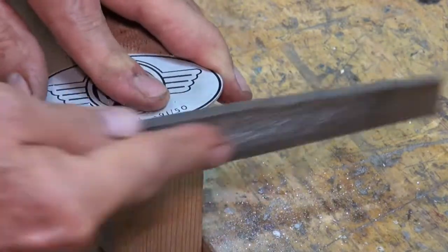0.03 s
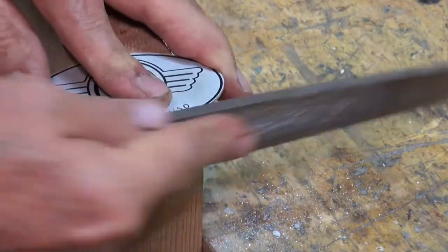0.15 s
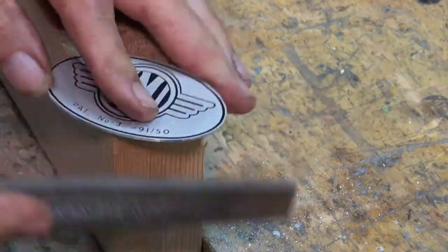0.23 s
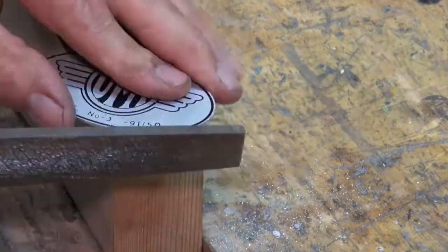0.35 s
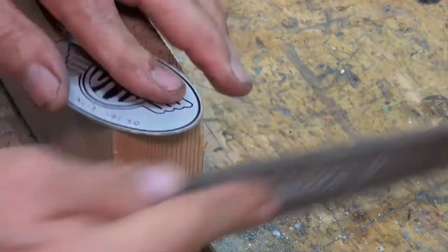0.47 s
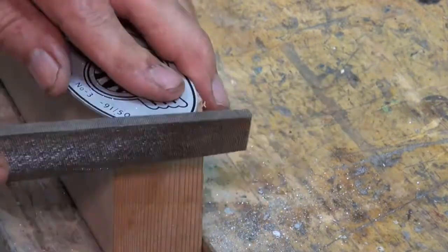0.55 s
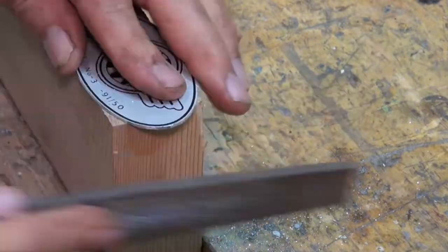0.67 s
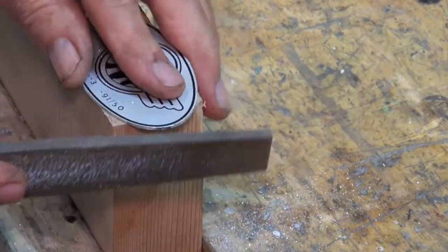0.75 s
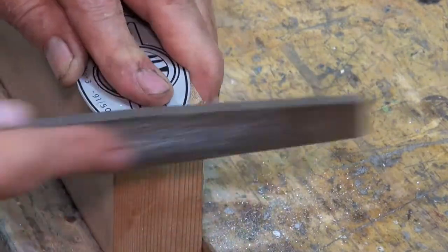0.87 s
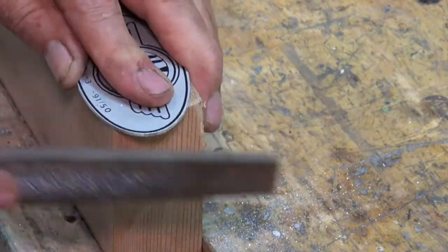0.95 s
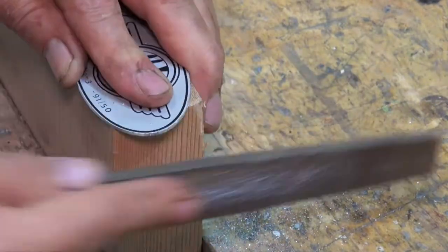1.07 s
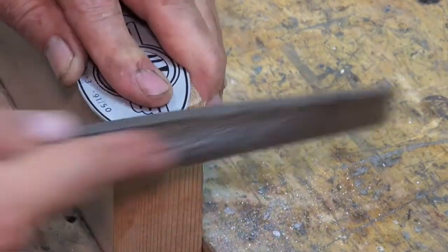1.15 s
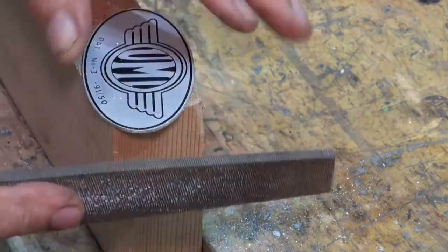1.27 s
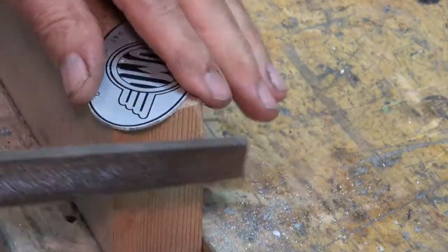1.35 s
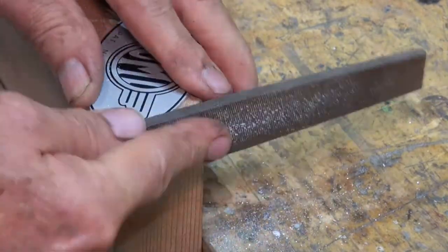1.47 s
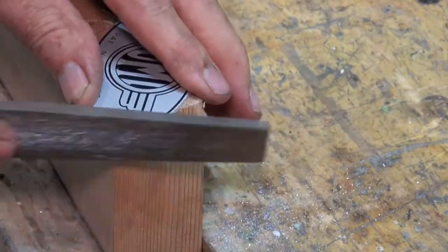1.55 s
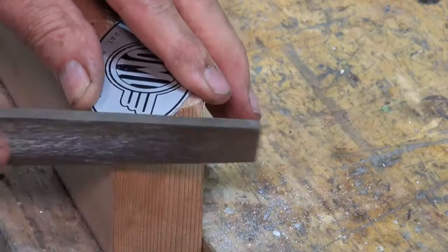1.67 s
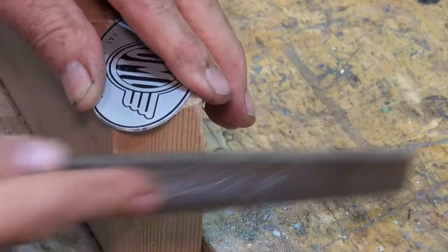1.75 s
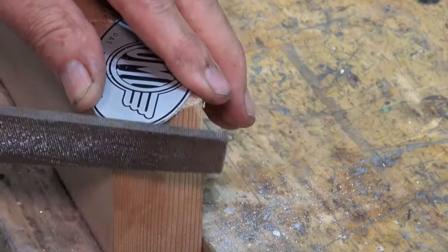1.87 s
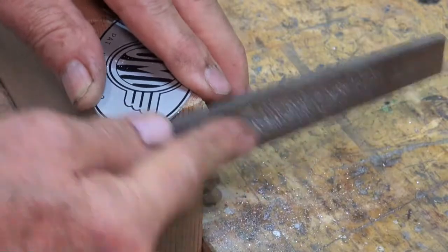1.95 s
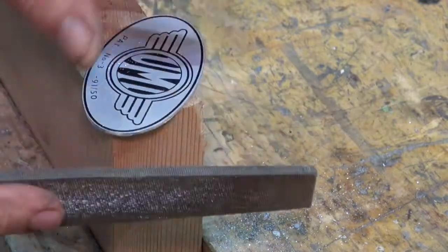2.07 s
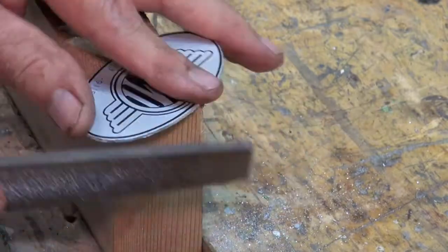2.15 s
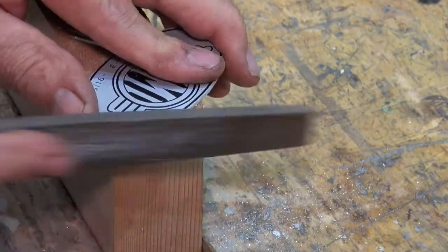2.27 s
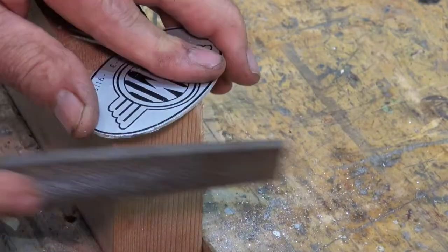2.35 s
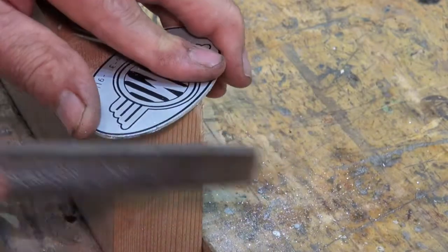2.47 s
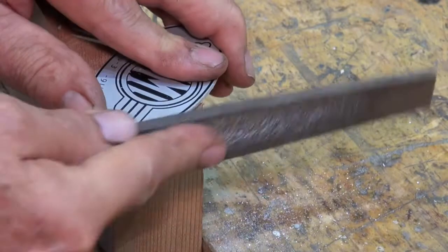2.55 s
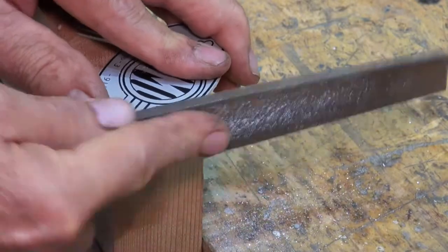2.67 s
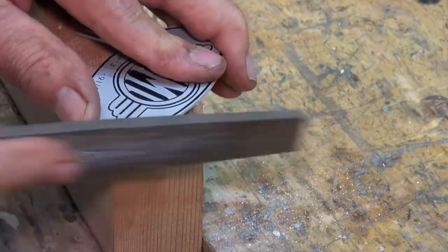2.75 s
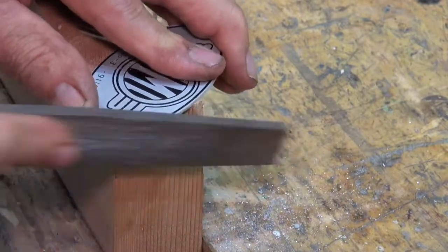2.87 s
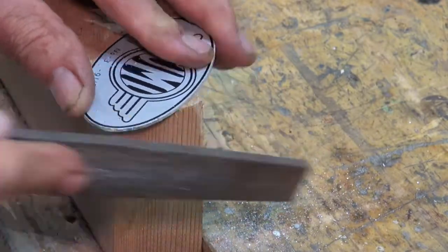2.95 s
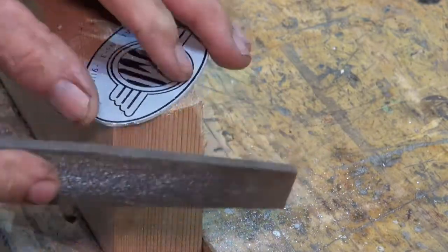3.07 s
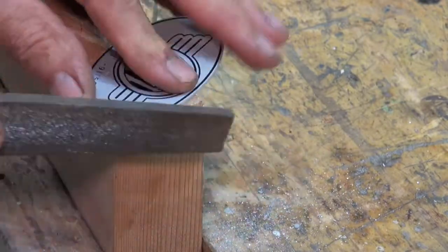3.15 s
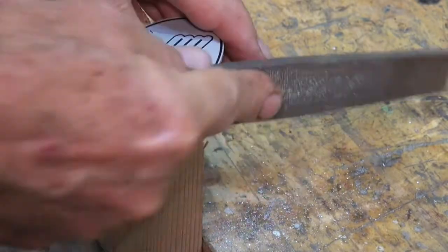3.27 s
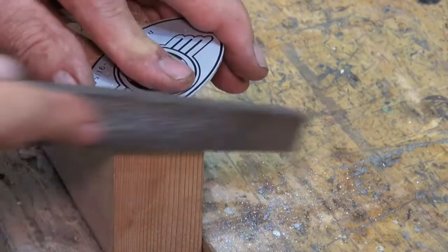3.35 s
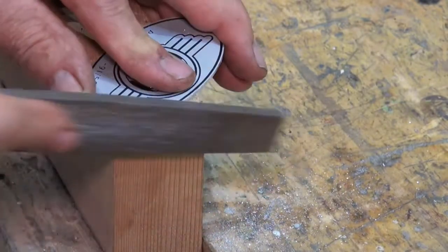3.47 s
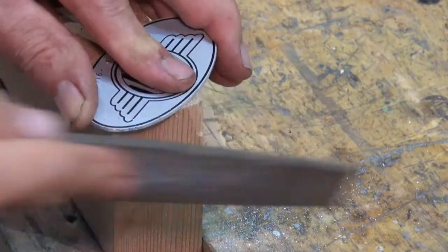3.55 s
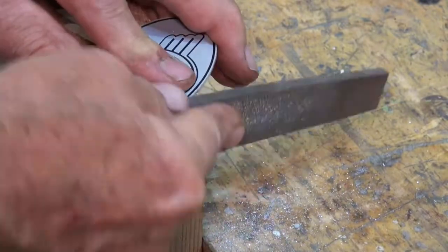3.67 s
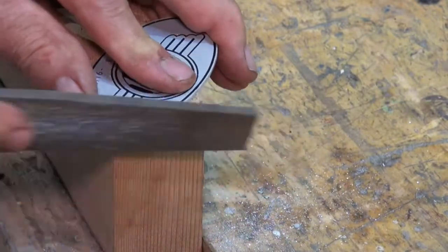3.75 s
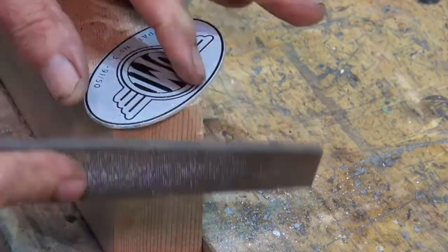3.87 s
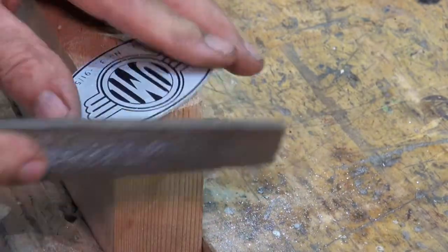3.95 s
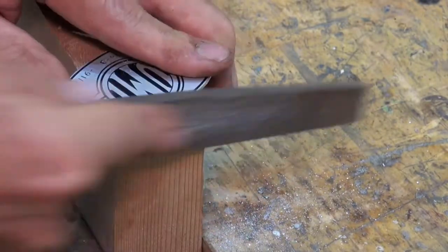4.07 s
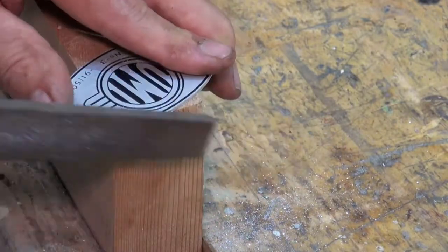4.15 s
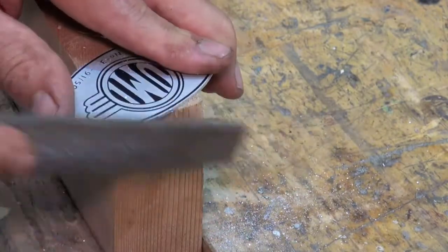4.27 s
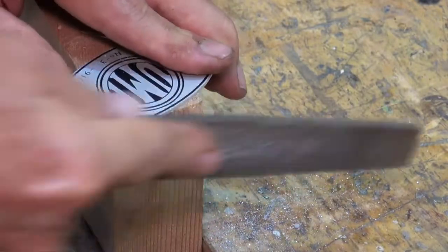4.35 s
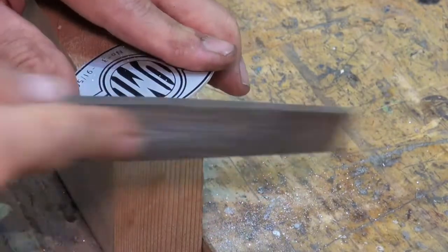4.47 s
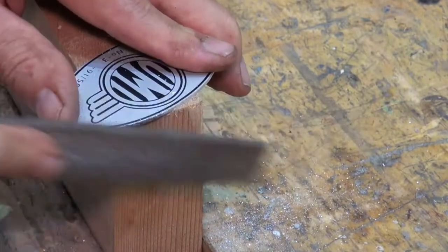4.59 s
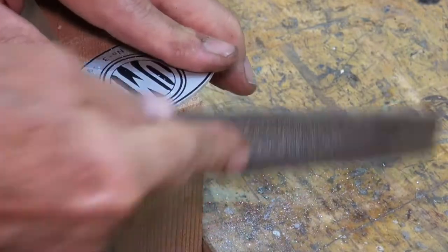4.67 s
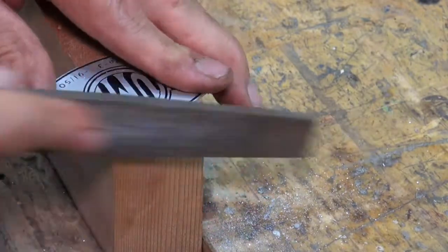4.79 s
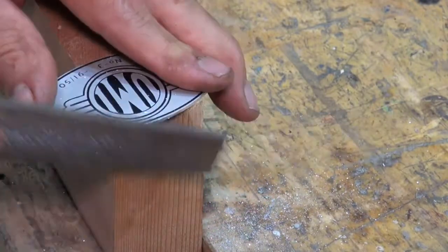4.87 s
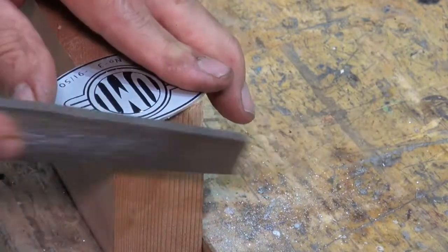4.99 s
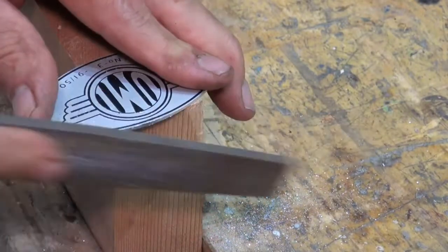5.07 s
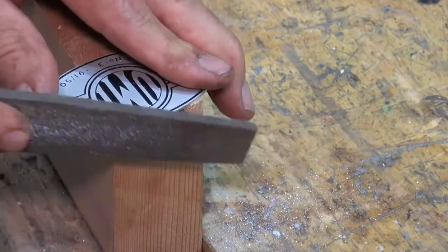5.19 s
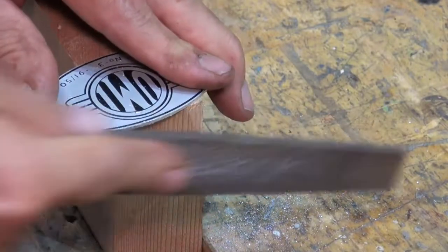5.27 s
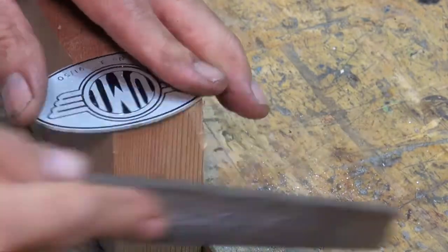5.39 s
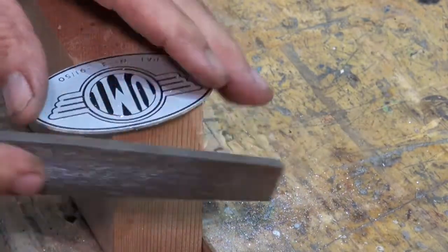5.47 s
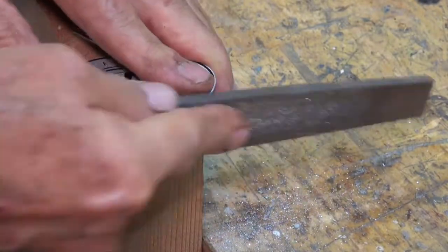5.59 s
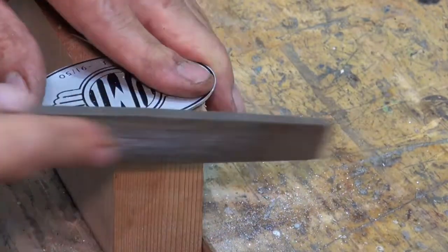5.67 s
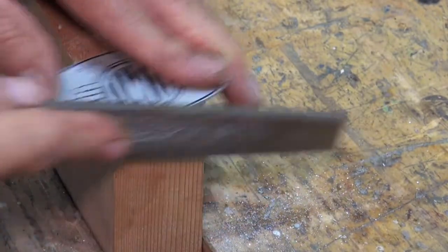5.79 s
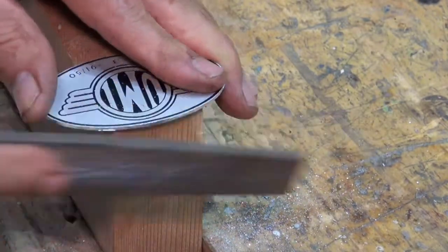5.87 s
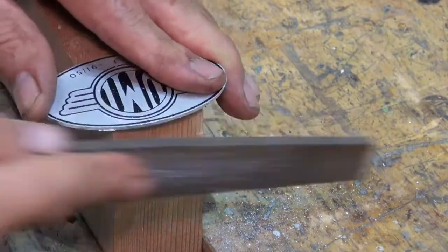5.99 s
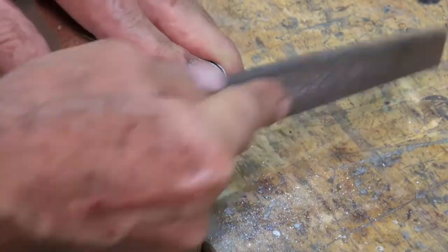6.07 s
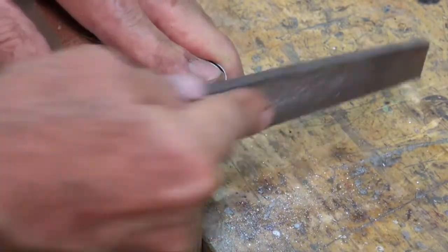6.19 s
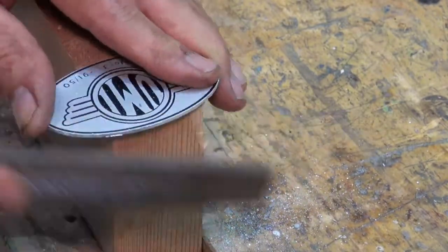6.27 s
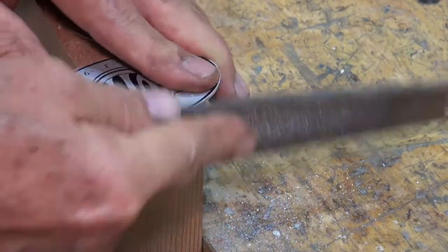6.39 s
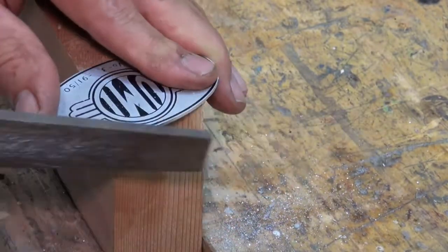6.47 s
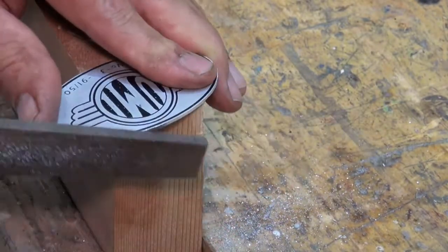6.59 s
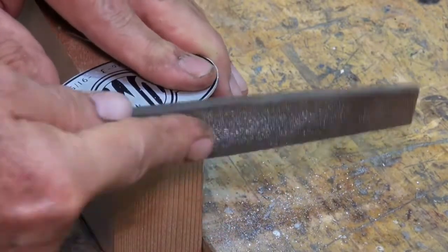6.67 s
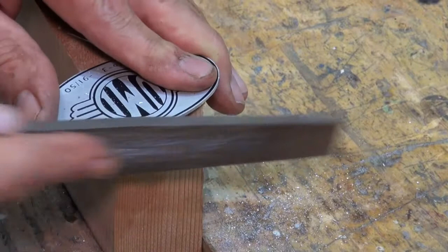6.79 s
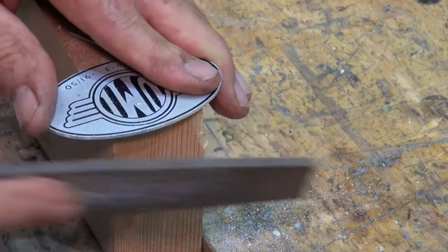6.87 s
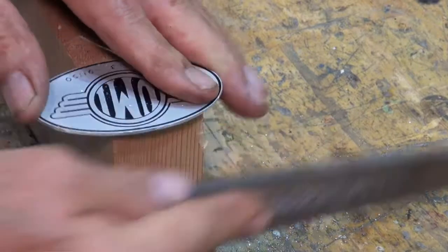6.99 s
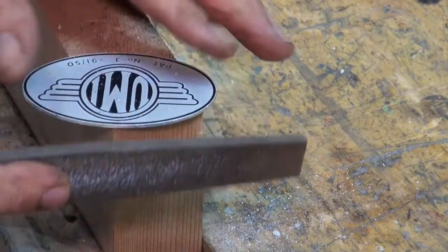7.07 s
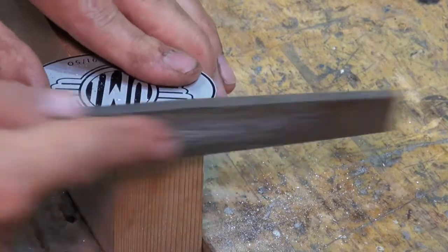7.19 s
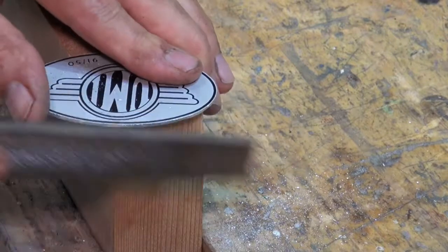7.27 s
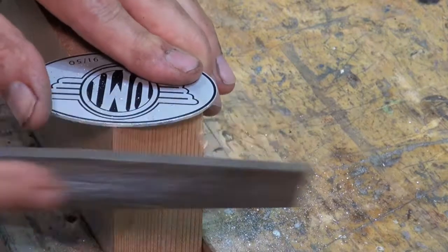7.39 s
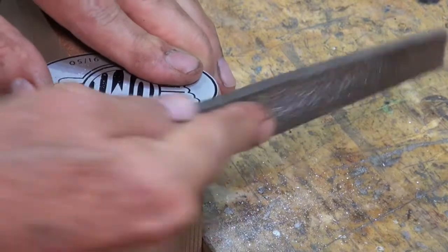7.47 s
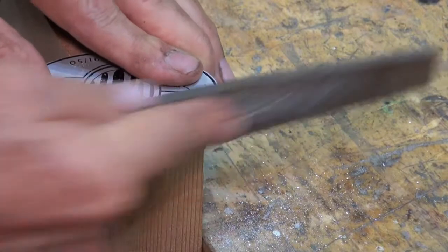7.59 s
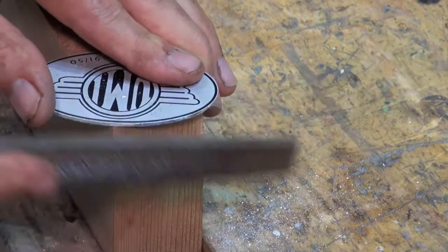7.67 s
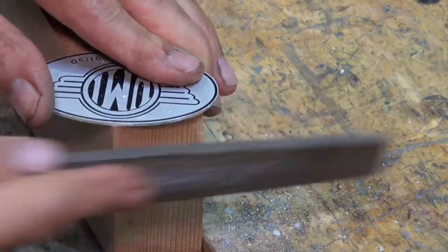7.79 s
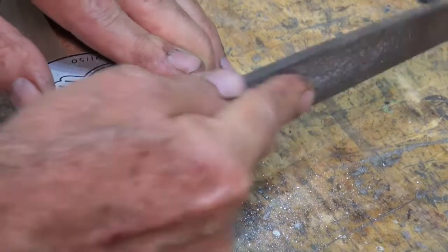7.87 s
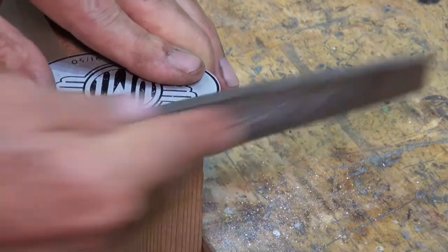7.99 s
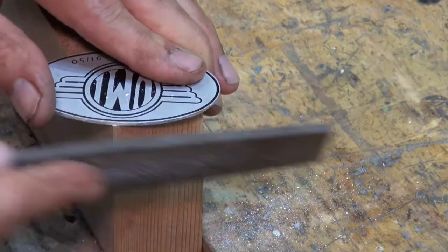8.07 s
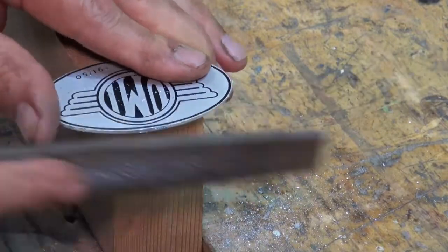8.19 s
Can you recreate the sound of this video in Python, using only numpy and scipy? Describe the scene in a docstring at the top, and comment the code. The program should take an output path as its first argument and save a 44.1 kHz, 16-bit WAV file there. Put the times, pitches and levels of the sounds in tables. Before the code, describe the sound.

Close, rapid filing of thin metal on a wooden block, each gritty stroke ticking, buzzing and ringing briefly.

```python
"""Filing a thin metal plate on a wooden block, heard close up in stereo in a quiet, dry workshop. Over the
faint hum of the room a steel file lands on the rim with a tick, drags, bites and lifts. Its teeth buzz the
modes of plate and file, grit hisses, the block thuds, and the lifted file rings on briefly. Short strokes
follow in runs for eight seconds. In some early pauses fingers nudge and slide the plate; a few of the loudest
strokes come with a short, dull low thump."""
import sys
import numpy as np
from scipy import signal
from scipy.fft import rfft, irfft, next_fast_len
from scipy.io import wavfile
from scipy.ndimage import uniform_filter1d, map_coordinates

SR = 44100
rng = np.random.default_rng(int(sys.argv[2]) if len(sys.argv) > 2 else 0)


def generate_wav(signal):
    """Clip the signal to [-1, 1] and save it as 16-bit WAV at the path in sys.argv[1]."""
    frames = np.transpose(np.atleast_2d(signal))
    scaled = np.clip(frames, -1, 1) * 32767
    pcm = np.round(scaled).astype(np.int16)
    wavfile.write(sys.argv[1], SR, pcm)


N = 363384
TIME = np.arange(N) / SR

# file strokes: landing_s, tick_db, full_bite_after_ms, lift_after_ms, bite_db, brightness_db
STROKES = [(0.0224, -16.5, 48.5, 73, -19.5, -9.5), (0.1643, -7, 36, 50.3, -19, -6),
           (0.4341, -15.5, 48.5, 69, -16.5, -8.5), (0.6201, -19, 35, 68, -19, -6.5),
           (0.8866, -15.5, 45, 68.4, -16.5, -10), (1.051, -9.5, 25, 59.4, -15.5, -11.5),
           (1.183, -8.5, 33.4, 51.5, -15.5, -8), (1.4572, -16.5, 56.7, 65.6, -13, -8),
           (1.614, -10, 29, 43, -12.5, -11), (1.739, -9, 29, 48.6, -17, -7),
           (1.8645, -9.5, 12, 22, -25.5, -12), (1.936, -10, 42.4, 63, -15, -9.5),
           (2.2499, -26, 84.6, 121.5, -17.5, -9), (2.439, -10.5, 29, 41, -16.5, -4.5),
           (2.5547, -8, 35.5, 49.6, -13, -9), (2.685, -10, 23, 45, -16, -9),
           (2.7965, -16, 25, 44, -15.5, -11.5), (2.916, -15.5, 36, 49.2, -19.5, -4.5),
           (3.2357, -25.5, 57.6, 82.3, -18, -8), (3.3949, -7.5, 43.6, 42.6, -15.5, -5),
           (3.5178, -8.5, 41, 53.4, -20.5, -4), (3.65, -21, 61, 65, -16, -4.5),
           (3.808, -9.5, 25, 47, -19.5, -7.5), (4.0716, -20.5, 58, 80.5, -17.5, -7),
           (4.2303, -13, 32, 50.6, -17, -6.5), (4.3524, -7.5, 32, 41.3, -19, -5),
           (4.4458, -11.5, 43.6, 38.6, -16.5, -1.5), (4.5655, -7.5, 34, 33.7, -19, -2.5),
           (4.6726, -9.5, 23, 47.4, -21, -4.5), (4.8234, -15.5, 41.5, 52.4, -17, -4),
           (4.9476, -9, 35, 38.6, -19, -4), (5.0492, -10, 37, 46, -18, -4.5),
           (5.1588, -9, 30, 37, -15.5, -4.5), (5.2604, -12, 31.4, 42, -18, -4),
           (5.3744, -9.5, 28.5, 37.4, -20, -2.5), (5.5798, -19.5, 46, 62.2, -16, -5.5),
           (5.717, -8, 30, 43, -20.5, -6.5), (5.8397, -5.5, 5.7, 39, -20, -6),
           (5.9654, -10.5, 33.5, 45.3, -16, -6), (6.0892, -10, 20, 44, -18.5, -7),
           (6.2163, -8.5, 16, 42.7, -21, -7.5), (6.3817, -19.5, 43, 64, -16, -7),
           (6.528, -16, 38, 58, -21.5, -3.5), (6.6605, -19, 63, 61.5, -15.5, -1.5),
           (6.8129, -11.5, 38, 69, -19.5, -5), (6.9648, -12, 31.4, 56.4, -22.5, -2.5),
           (7.206, -28, 47.3, 73.4, -19, -8), (7.3529, -9.5, 8, 56, -20, -7),
           (7.4897, -8.5, 18, 47, -19.5, -7), (7.6176, -5.5, 31.6, 55, -16, -9.5),
           (7.7552, -8, 27, 48, -19.5, -5.5), (7.89, -7.5, 14, 42.4, -19.5, -6),
           (8.0205, -8.5, 32, 48.3, -17.5, -7), (8.1556, -13, 26.6, 27.6, -18, -2)]
# modes of the plate before it is pressed down: pitch_hz, width_hz, level_db
LOOSE_PLATE_MODES = [(1890, 113, 1), (2248, 48, 4), (2700, 300, -8), (6110, 440, -10.5)]
# spectrum of rubbing grit: frequency_hz, density_db
GRIT_SPECTRUM = [(500, -15.5), (900, -16.5), (1500, -11.5), (2700, -7), (3650, -11), (5600, -5), (6400, -9),
                 (9000, -11.5), (14400, -20.5), (16000, -21)]


def amp(db):
    """Decibels to gain."""
    return 10 ** (np.asarray(db) / 20)


def unit(x):
    """Scaled to rms 1."""
    return x / np.sqrt(np.mean(x ** 2) + 1e-20)


def along(points, hz):
    """Interpolate (frequency_hz, value) points on a log axis."""
    f, v = np.transpose(points)
    return np.interp(np.log(hz + 1), np.log(f + 1), v)


def wobble(rate):
    """A smooth random curve, rate knots a second."""
    return map_coordinates(rng.standard_normal(int(N * rate / SR) + 4), [TIME * rate])


def filtered(x, response):
    """x through a complex frequency response."""
    size = next_fast_len(N + SR // 2)
    return irfft(rfft(x, size) * response(np.fft.rfftfreq(size, 1 / SR)), size)[..., :N]


def modes(table):
    """The response of (pitch_hz, width_hz, level_db) resonances of alternating sign."""
    return lambda f: sum((-1) ** k * amp(db) * 1j * f * width / (hz * hz - f * f + 1j * f * width)
                         for k, (hz, width, db) in enumerate(table))


def hiss(spectrum, level=1, spiky_db=0, patchy_db=0):
    """Two unrelated noises; spiky ones come in uneven grains, patchy ones change colour as they go."""
    spectra = signal.stft(rng.standard_normal((2, N)) * amp(spiky_db * wobble(900)), nperseg=256)[2]
    patches = uniform_filter1d(rng.standard_normal(spectra.shape[1:]), size=3, axis=0)
    patches = uniform_filter1d(patches, size=5, axis=1)
    grains = signal.istft(spectra * amp(patchy_db * unit(patches)), nperseg=256)[1][:, :N]
    colour = lambda hz: amp(along([(1, -120)] + spectrum, hz))
    colour_rms = np.sqrt(np.mean(colour(np.linspace(0, SR / 2, num=4096)) ** 2))
    return filtered(level * unit(grains), colour) / colour_rms


def workshop():
    """Room tone: still air, a faint steady whine and two low tones that sag."""
    air_spectrum = [(20, -12), (250, -14.5), (690, -10.5), (1020, -13.5), (2370, -13.5), (3420, -14.5),
                    (7100, -18), (11100, -23), (16000, -18.5)]  # still air: frequency_hz, density_db
    whine = [(1000, -70)]  # the steady tone: pitch_hz, level_db
    moans = [
        [(1.75, 276, -72), (2.0, 274.6, -58), (2.32, 269, -59), (2.6, 269, -71)],
        [(5.25, 214, -63), (5.4, 212, -58.5), (5.56, 212, -56), (5.62, 209, -88)],
    ]  # one path for each low tone: time_s, pitch_hz, level_db
    tones = sum(amp(db + 6.5 + 1.3 * wobble(16)) * np.sin(2 * np.pi * hz * TIME) for hz, db in whine)
    for path in moans:
        s, hz, db = np.transpose(path)
        phase = 2 * np.pi * np.cumsum(np.interp(TIME, s, hz)) / SR
        tones += amp(np.interp(TIME, s, db + 1.5, left=-120, right=-120)) * np.sin(phase)
    return amp(-50.5) * hiss(air_spectrum) + tones * [[1], [0]]  # tones in the mid channel only


def walls(x):
    """The room's short answer, in which the treble dies a little sooner."""
    decay = [(300, 0.074), (2000, 0.069), (12000, 0.065)]  # reverberation: frequency_hz, t60_s
    hz, t, spectra = signal.stft(rng.standard_normal((2, SR // 3)), SR, nperseg=256)
    tail = signal.istft(spectra * amp(-60 * t / along(decay, hz)[:, None]), SR, nperseg=256)[1]
    delayed = np.pad(x, ((0, 0), (200, 0)))
    return signal.fftconvolve(delayed, tail / np.linalg.norm(tail[0]), axes=1)[:, :N]


def fingers():
    """Shifted between strokes, the plate scuffs the block."""
    slides = [(.245, .31, -42), (0.77, .88, -45.5), (2.258, 2.32, -41), (3.09, 3.13, -47.5)]  # scuffs: start_s, end_s, level_db
    level = sum(amp(db) * (TIME > start) * (TIME < end) for start, end, db in slides)
    return hiss(GRIT_SPECTRUM, uniform_filter1d(level, size=500), spiky_db=-1.5, patchy_db=4.5)


def thumps():
    """Short, dull low thumps with a few of the loudest strokes: one pulse each, without ring."""
    pulses = [(1.977, -39), (2.712, -39), (6.416, -34), (6.849, -40), (7.659, -42)]  # low thumps: start_s, level_db
    out, age = np.zeros(N), TIME[:1500] / 0.00098  # age in rise times
    for s, db in pulses:
        out[round(s * SR):][:1500] = amp(db) * age * np.exp(1 - age)
    return out * [[1], [.6]]


def block(pressure, bright_db, block_db):
    """The wooden block thuds, following pressure and brightness weakly; the bench shakes under it."""
    wood_modes = [(540.3, 49.4, 3), (628.4, 32, -2), (755, 36, -7), (991, 88, -4.5)]  # the block's resonances: pitch_hz, width_hz, level_db
    shake_spectrum = [(20, 12), (240, 17), (420, -30), (560, -11), (900, -78)]  # bench rumble: frequency_hz, density_db
    force = np.abs(pressure) ** 0.81 * amp(block_db + 5.5 + 0.38 * bright_db + 1.75 * wobble(40))
    thuds = filtered(force * rng.standard_normal((2, N)), modes(wood_modes))
    return thuds + hiss(shake_spectrum, pressure * amp(-42 + 2.5 * wobble(8)))


def landings():
    """The file meets the rim with a sharp tick; lighter taps die more slowly. Both ring the loose plate."""
    taps = [(0.772, -33.5, 0.05), (1.374, -39.5, 0.15), (1.8856, -23, 0.034), (2.1843, -39, 0.05),
            (2.2687, -26, 0.043), (3.048, -38, 0.05), (3.1028, -43.5, 0.041), (3.992, -33, 0.15),
            (4.0721, -59, 0.05)]  # the plate is set down or nudged: start_s, level_db, t60_s
    tick_spectrum = [(300, -46), (1500, -16), (2200, -2.5), (4000, -7.5), (6000, 13.5), (10000, -2),
                     (16000, 2)]  # the bright contact: frequency_hz, density_db
    blows = np.zeros(N)
    for s, db, t60 in [(s, db, .009) for s, db, *_ in STROKES] + list(taps):
        blows[round(s * SR):][:3000] += amp(db - 60 * TIME[:3000] / t60)
    tick = hiss(tick_spectrum, blows)
    return tick + amp(15) * filtered(tick, modes(LOOSE_PLATE_MODES))


def hand():
    """Pressure on the rim, how loose the plate still is, the stroke's brightness and its travel."""
    sag_db_per_ms, bite_db_per_ms, lift_db_per_ms = 0.74, 0.84, 0.66
    pressure, loose, bright_db, travel = np.zeros((4, N))
    for s, tick_db, bite_ms, lift_ms, bite_db, brightness_db in STROKES:
        now = slice(round(s * SR), N)  # holds until the next landing
        ms = 1000 * (TIME[now] - s)
        drag = amp(tick_db - 5 - sag_db_per_ms * ms)
        bite = amp(bite_db - bite_db_per_ms * np.maximum(bite_ms - ms, 0))
        lift = amp(-lift_db_per_ms * np.maximum(ms - lift_ms, 0))
        pressure[now] = np.hypot(drag, bite) * lift * (1 - np.exp(-ms / 0.84))
        loose[now] = np.exp(-ms / 22)
        bright_db[now], travel[now] = brightness_db, ms / lift_ms
    return pressure, loose, bright_db, travel


def grip():
    """Each turn of the plate gives a new grip, which holds until the next."""
    # grips: start_s, stiff_share_at_lift, zing_db, fine_grit_db, free_ring_db, block_db
    grips = [(0, .1, -9, -10, -9, -2), (0.42, 0.08, -3, -4, 1, -1.5), (0.88, 0.06, 4, -4, 0.5, -2),
             (1.45, .1, 2.5, -8, 1.5, -1), (2.24, 0.17, 7, -17, 0, 0), (3.22, 0.07, 2.5, -8, 0, -1.5),
             (4.06, 0.63, 0.5, -7, 1, -1), (4.81, 0.58, 3, -8, -15, -1), (5.57, 0.14, -1, -6, 0, 0),
             (6.37, 0.3, 7, -12, 2.5, -1.5), (7.19, 0.28, -2, -4, -2, 2)]
    starts, *columns = np.transpose(grips)
    current = np.maximum(np.searchsorted(starts, TIME, side="right") - 1, 0)
    return [column[current] for column in columns]


def grit(chatter, loose, bright_db, fine_db):
    """Coarse grit hisses more as the plate is pressed down; the finest adds a flickering top."""
    fine_spectrum = [(7000, -38), (11500, -18), (16000, -15)]  # the finest grit: frequency_hz, density_db
    coarse = hiss(GRIT_SPECTRUM, chatter * amp(bright_db + 5.5 - 4.45 * loose), patchy_db=2.0)
    return coarse + hiss(fine_spectrum, chatter * amp(bright_db + fine_db), patchy_db=5.0)


def catches(level, **texture):
    """Teeth catch the rim at random: a nearly white force."""
    return hiss([(300, 1.5), (1500, -1), (16000, -2.5)], level, **texture)


def teeth(speedup, unsteady, scatter_db):
    """Runs of teeth buzz on the rim at an uneven depth, a little faster as the file speeds up."""
    runs = [(0.479, 1644, -16), (0.492, 2843, -14.5), (0.659, 1550, -13), (0.68, 970, -12),
            (0.685, 2850, -16.5), (0.953, 2770, -10.5), (1.09, 1520, -8), (1.106, 2806, -12),
            (1.232, 2800, -13), (1.519, 2800, -14), (1.644, 1486, -6), (1.664, 2814, -8),
            (1.764, 1520, -10), (1.981, 1490, -7), (2.349, 1610, -11), (2.363, 990, -14),
            (2.595, 1927, -14.5), (2.718, 1650, -9), (2.829, 1863, -6.5), (3.298, 1940, -9.5),
            (3.426, 2110, -10), (3.437, 2780, -9.5), (3.554, 1845, -13), (3.562, 2900, -13),
            (3.707, 1914, -11), (3.717, 2780, -7.5), (3.845, 1850, -15), (4.13, 1900, -6),
            (4.141, 2885, -12.5), (4.277, 2900, -14), (4.377, 2865, -15.5), (4.492, 2820, -12.5),
            (4.987, 2870, -17.5), (5.073, 1795, -14), (5.094, 2950, -15.5), (5.305, 3140, -14),
            (5.402, 2900, -19), (5.633, 1904, -15.5), (5.853, 2800, -25), (5.855, 1850, -14),
            (6.134, 2810, -15), (6.234, 1877, -15.5), (6.425, 1870, -5.5), (6.713, 1880, -11),
            (6.854, 1524, -11.5), (6.858, 1910, -11.5), (7.405, 990, -12.5), (7.652, 1875, -17),
            (7.669, 2874, -9.5), (7.807, 2980, -17.5), (7.937, 2840, -18), (8.066, 2874, -20)]  # the teeth fall in step with a mode: middle_s, pitch_hz, level_db
    out, ms = np.zeros((2, N)), np.arange(-3000, 3000) * 1000 / SR
    jitter, depth = np.array([wobble(300), wobble(450)]), amp(scatter_db * wobble(120))
    for s, hz, db in runs:
        length_ms = 8.6 * (hz / 1000) ** 0.59  # higher modes hold the teeth longer
        now = slice(round(s * SR) - 3000, round(s * SR) + 3000)
        rate_hz = hz * (1 + speedup * np.clip(ms / 20, -1, 1) + unsteady * jitter[:, now])
        phase = 2 * np.pi * np.cumsum(rate_hz, axis=1) / SR
        swell_db = db - 22 * (ms / length_ms) ** 2
        tail_db = np.where(ms > 0, db - 5.5 - 0.65 * ms, -120)  # the mode dies away after the run
        out[:, now] += amp(np.maximum(swell_db, tail_db)) * (np.cos(phase) + 0.092 * np.cos(2 * phase))
    return out * depth


def free_ring(pressure, buzz, ring_db):
    """Lightly damped modes of the file ring on after it lifts."""
    free_modes = [(1635, -18, 0.23), (2507, -16, 0.077), (2840, -22.5, 0.078), (3064, -29, .12),
                  (5900, -30, 0.075)]  # the lifted file: pitch_hz, level_db, t60_s
    resonances = [(hz, np.log(1000) / np.pi / t60, db) for hz, db, t60 in free_modes]
    force = amp(ring_db) * (1.2 * catches(pressure) + 0.84 * buzz)
    return amp(23.5) * filtered(force, modes(resonances))


def zing(pressed, bright_db, zing_db):
    """The file's high modes grow faster than the brightness, so a bright stroke rings out."""
    high_modes = [(7170, 200, -4), (8880, 160, 2), (9300, 140, 2.5), (10130, 230, -0.5)]  # the steel file: pitch_hz, width_hz, level_db
    force = catches(pressed * amp(zing_db + 9.5 + 1.82 * bright_db), spiky_db=1.5, patchy_db=2.2)
    return filtered(force, modes(high_modes))


def plate(pressed, unpressed, buzz, stiff):
    """The plate rattles while loose, then rings with the file; a stiff grip raises its modes."""
    loaded_modes = [(1290, 36.6, -2), (1533, 37.6, 3.5), (1935, 62, 0.5), (2207, 56, -2), (2343, 64, -2),
                    (2624, 110, -10), (2825, 84, 6.5), (2871, 34, -7), (3186, 31, -4.5), (3457, 35, -7),
                    (3985, 95, -0.5), (4540, 45, -10.5), (5336, 110, -2.5), (5800, 65, -2.5)]  # plate and file under load: pitch_hz, width_hz, level_db
    raised_modes = [(hz * 1.055, width, db) for hz, width, db in loaded_modes]
    force = catches(pressed, spiky_db=2.0, patchy_db=2.5)
    held_softly = filtered(force * np.sqrt(1 - stiff) + 0.18 * buzz, modes(loaded_modes))
    held_stiffly = filtered(force * np.sqrt(stiff), modes(raised_modes))
    rattle = filtered(catches(unpressed, spiky_db=2.0, patchy_db=1.6), modes(LOOSE_PLATE_MODES))
    return amp(11) * (held_softly + held_stiffly) + amp(12.5) * rattle


def filing():
    """Teeth and random catches ring the plate and file; grit and block follow the same pressure."""
    pressure, loose, bright_db, travel = hand()
    stiff_at_lift, zing_db, fine_db, ring_db, block_db = grip()
    stiff = np.clip(stiff_at_lift * travel ** 2, 0, 1)  # the rim stiffens as the file travels
    chatter = pressure * amp(2.04 * wobble(70))
    pressed = chatter * (1 - loose)
    buzz = amp(-3.5) * teeth(speedup=.03, unsteady=.05, scatter_db=2)
    metal = buzz + plate(pressed, chatter * loose, buzz, stiff)
    metal += free_ring(pressure, buzz, ring_db) + zing(pressed, bright_db, zing_db)
    return metal + grit(chatter, loose, bright_db, fine_db) + block(pressure, bright_db, block_db)


def scene():
    """The bench close to a stereo microphone, with the walls and room tone well behind it."""
    likeness = [(30, 0.57), (180, 0.87), (550, 0.98), (1200, 0.91), (2500, 0.72), (5000, 0.7),
                (15000, 0.71)]  # how alike left and right are: frequency_hz, correlation
    balance = [(60, 0), (150, -0.5), (380, 1), (950, -0.5), (2380, -2), (5980, -2.5), (15000, -1.5)]  # lean of the stereo image: frequency_hz, left_minus_right_db
    bench = filing() + thumps() + landings() + fingers()
    pair = bench + amp(-10.5) * walls(bench) + workshop()
    spread = lambda hz: np.arccos(np.clip(along(likeness, hz), -1, 1)) / 2
    mid, side = filtered(pair, lambda hz: np.array([np.cos(spread(hz)), np.sin(spread(hz))]))
    left_right = np.array([mid + side, mid - side])
    return filtered(left_right, lambda hz: amp(along(balance, hz) * np.array([[.5], [-.5]])))


def record(dry):
    """The input stage clips at full scale, thins the deep bass and cuts off the highest treble."""
    low_cut_hz, top_hz = 45, 15900
    return filtered(np.clip(dry, -1, 1), lambda hz: (hz < top_hz) * 1j * hz / (low_cut_hz + 1j * hz))


dry = scene()
out = record(dry)
generate_wav(out)
```